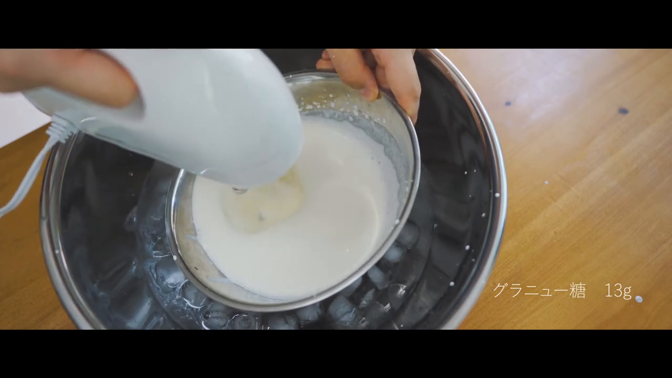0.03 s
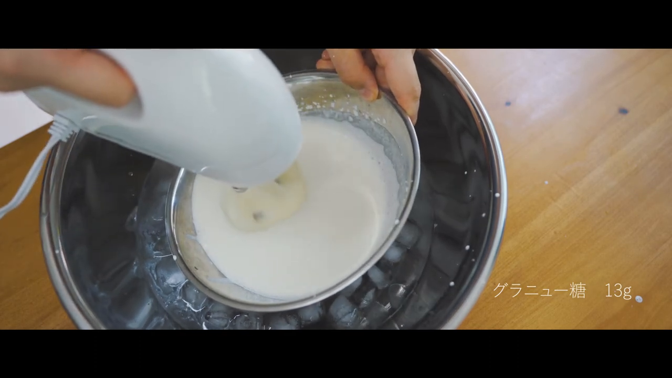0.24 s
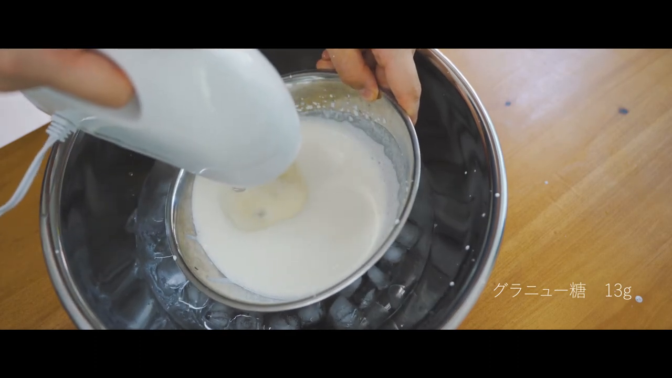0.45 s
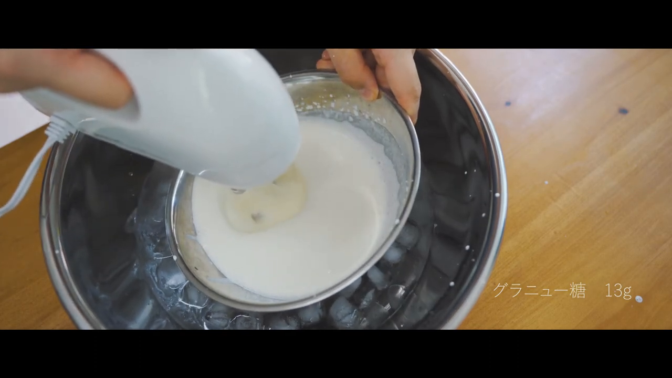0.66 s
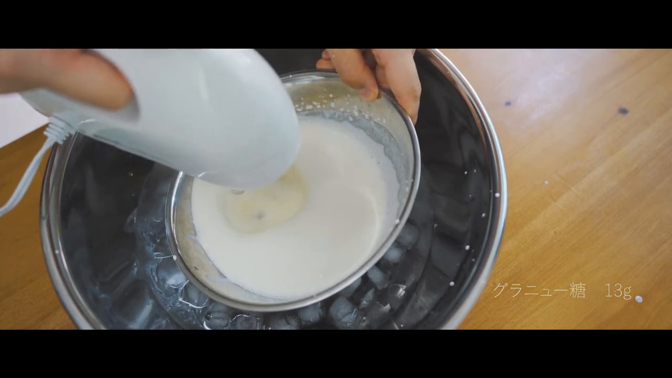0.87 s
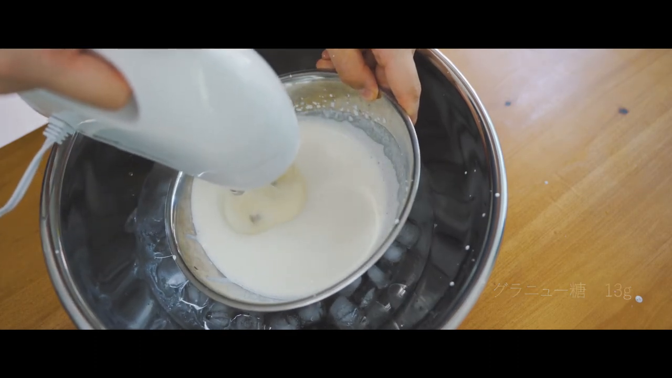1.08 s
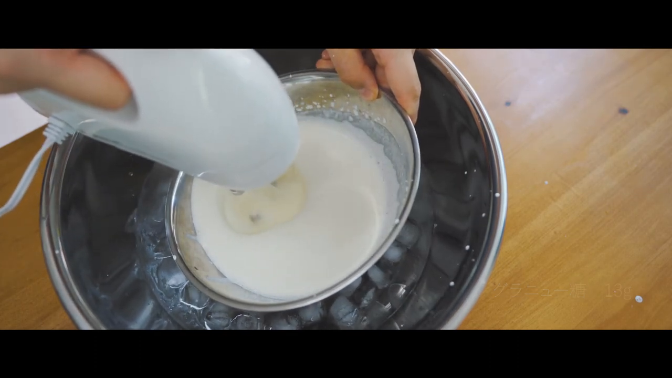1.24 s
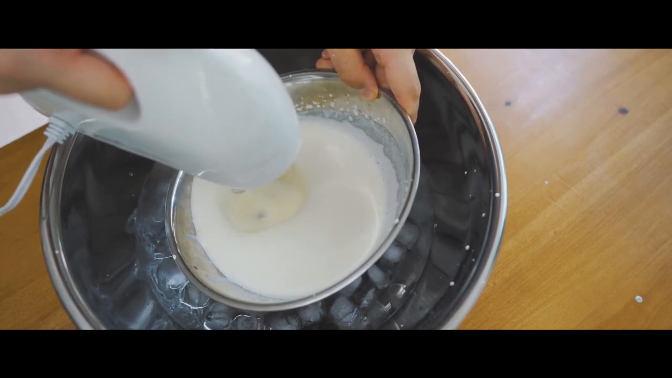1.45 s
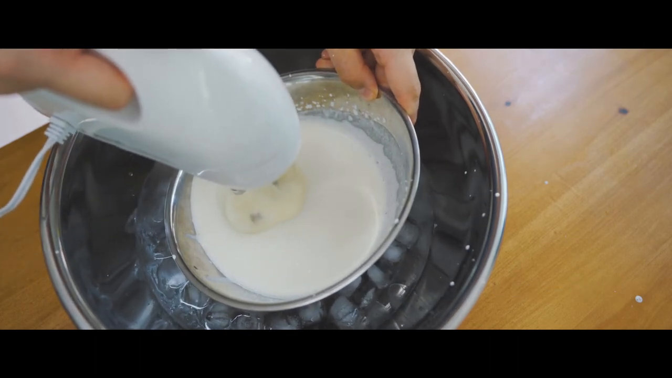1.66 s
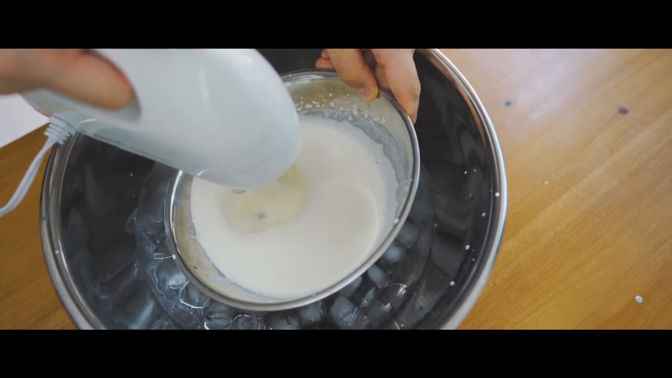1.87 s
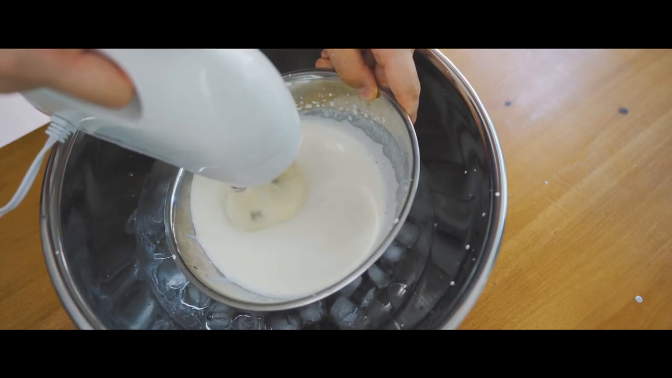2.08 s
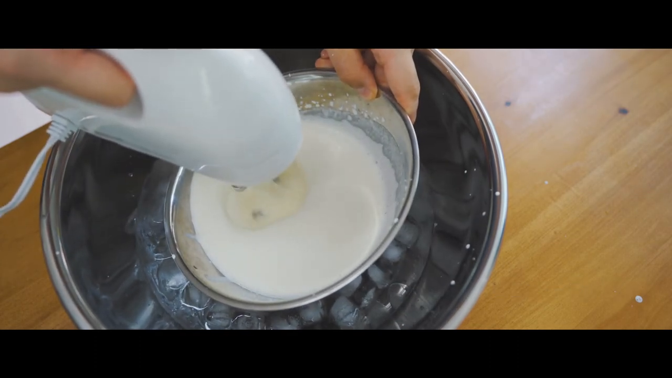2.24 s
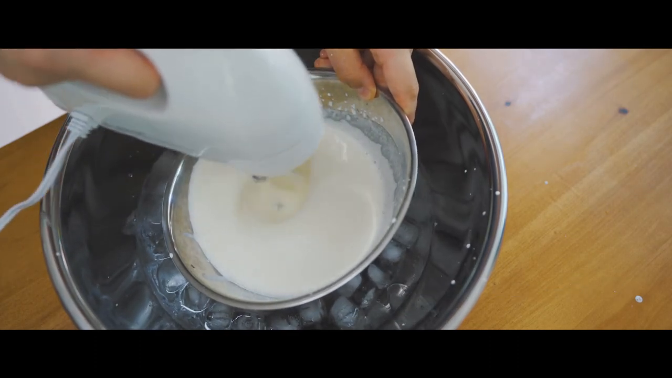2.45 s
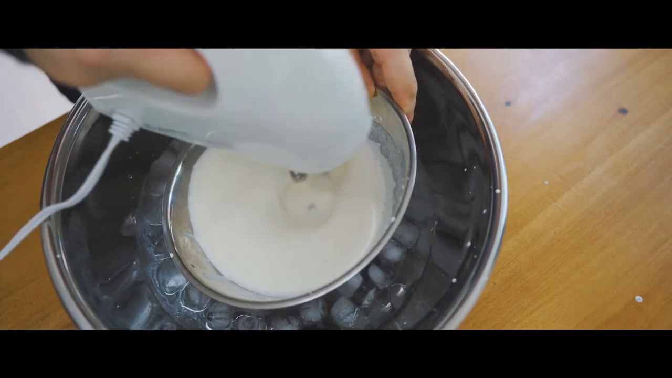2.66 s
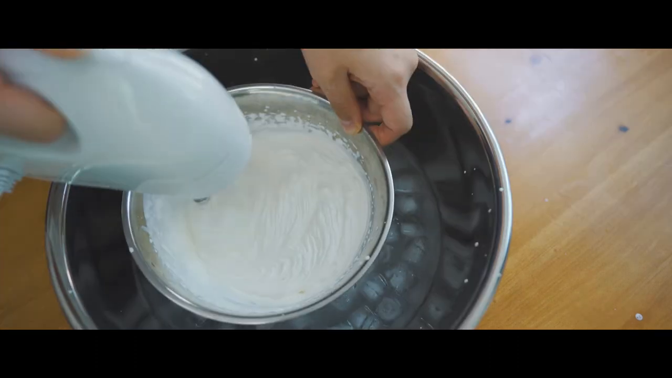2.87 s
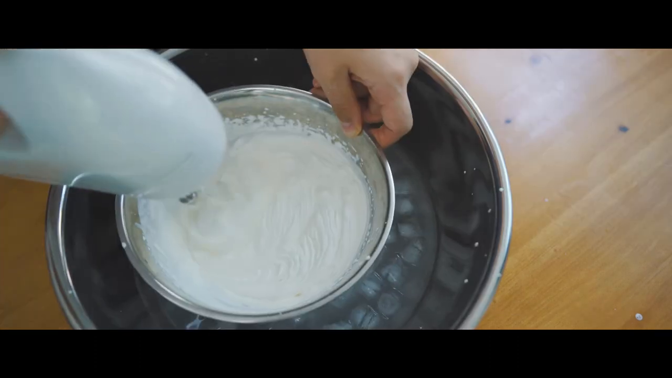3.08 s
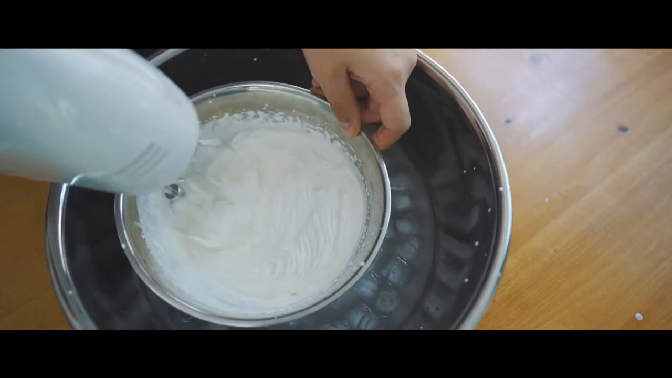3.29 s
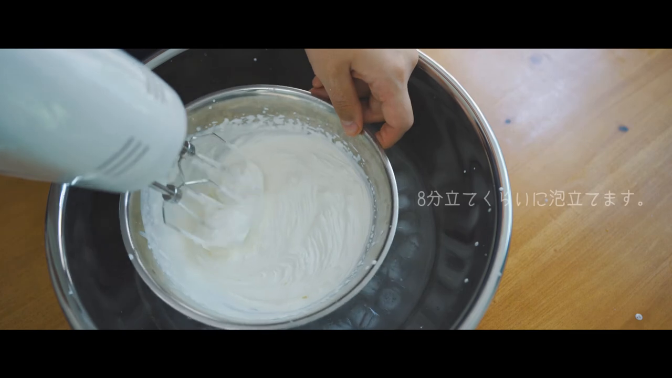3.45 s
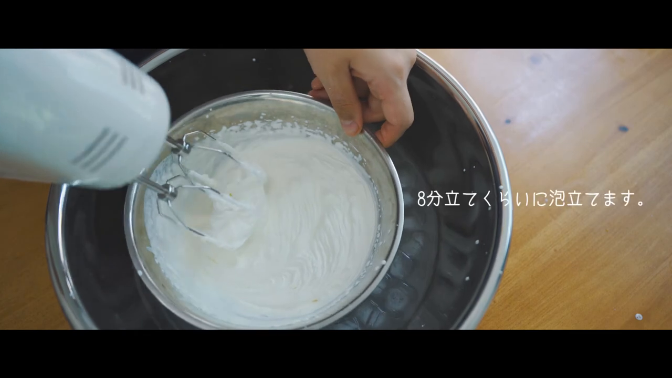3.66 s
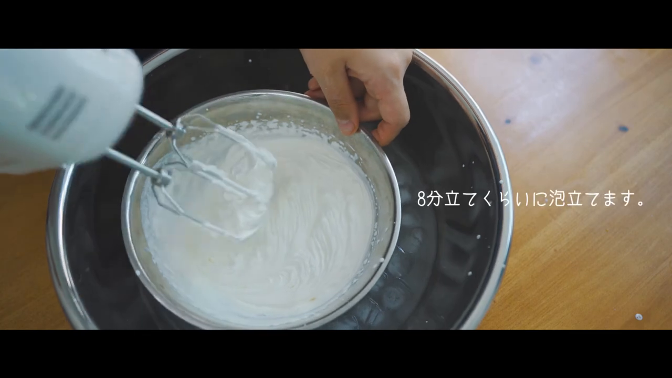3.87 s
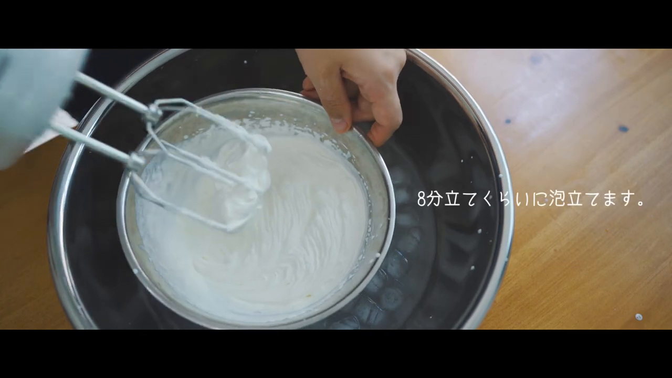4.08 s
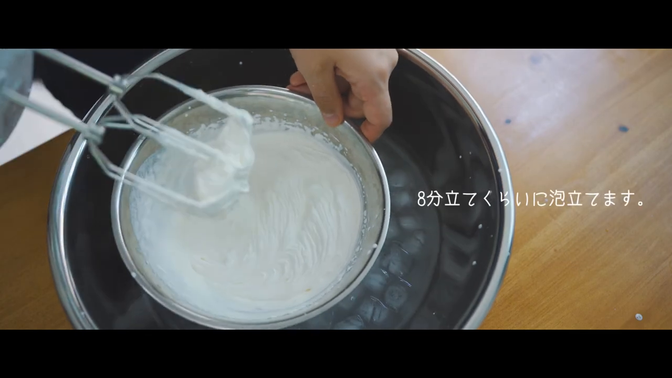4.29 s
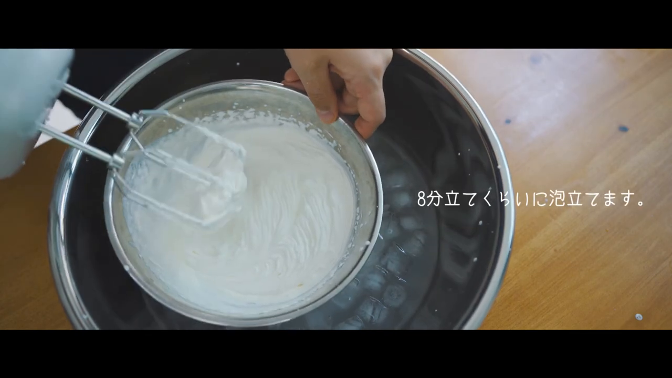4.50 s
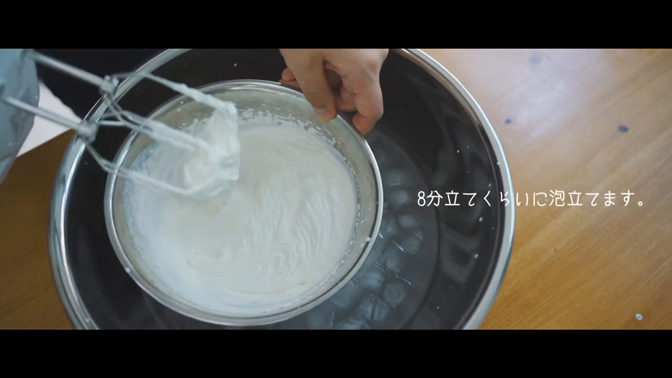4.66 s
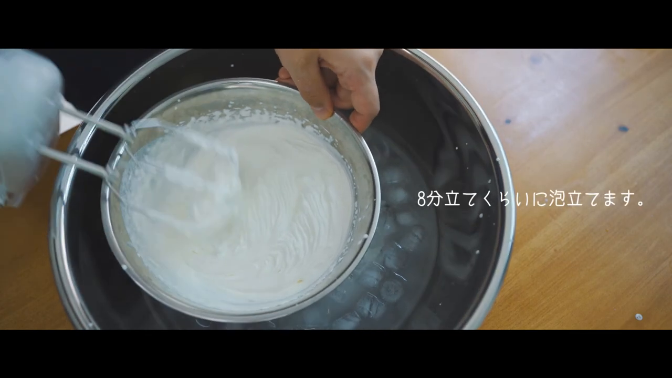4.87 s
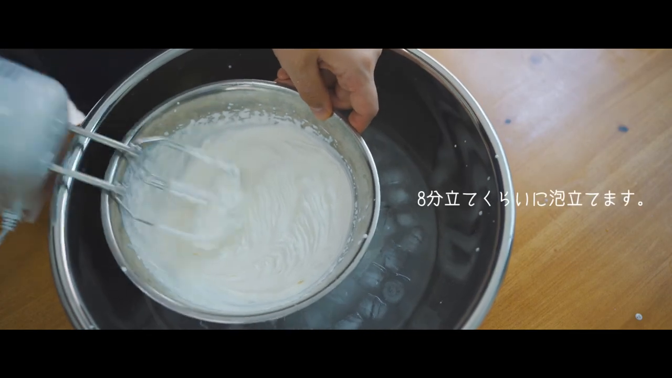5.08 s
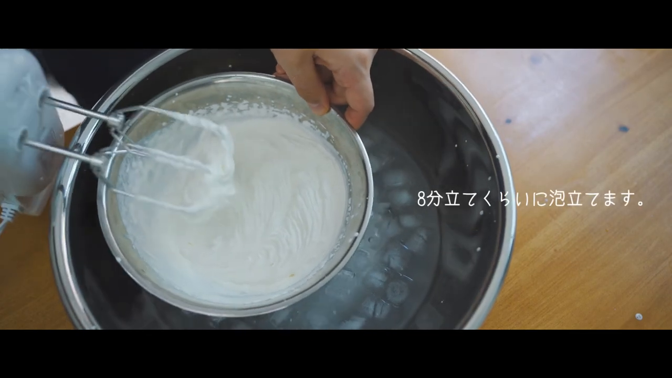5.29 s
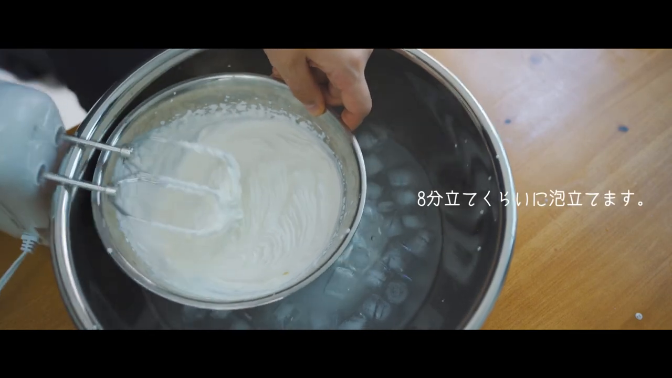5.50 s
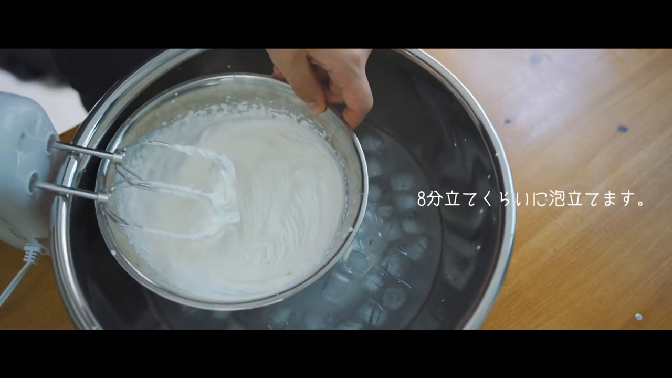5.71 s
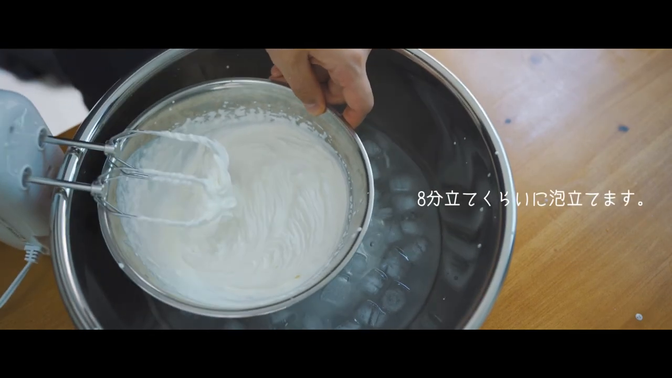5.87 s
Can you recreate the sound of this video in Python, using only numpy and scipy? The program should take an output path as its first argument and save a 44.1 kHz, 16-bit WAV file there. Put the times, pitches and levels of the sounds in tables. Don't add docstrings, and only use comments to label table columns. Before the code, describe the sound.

From the start an electric hand mixer runs close by, a piercing, slightly wavering whine near 2.9 kHz that rises a little in the first second, edged with mains buzz, over gear roar and airy fan hiss. Beaters make quick, soft flops in cream, growing fainter as it thickens. Low bumps around 2.7 seconds and a sharp knock near 2.9 mark the switch-off; the whine stops and a softer motor tone slides down, gone by 3.5. In the quiet kitchen, ice cubes tick brightly and briefly on steel from about 3.05, with small watery thuds, thickening into a stronger cluster around 4.4, then scattered clinks until 5. From 5.1 the steel bowls knock together in irregular clatter, strongest around 5.3 to 5.5, with noisy wet rattle and dull table bumps. A metallic ring lingers to the end near 6 seconds over faint refrigerator hum and room tone.

```python
import sys
import numpy as np
from scipy import signal
from scipy.fft import rfft, irfft
from scipy.io import wavfile
from scipy.ndimage import uniform_filter1d

SR = 44100
rng = np.random.default_rng(int(sys.argv[2]) if len(sys.argv) > 2 else 0)


def convert_level_to_amplitude(level_db):
    exponent = np.asarray(level_db, float) / 20
    return 10 ** exponent


def master_out(mix):
    frames = np.transpose(np.atleast_2d(mix))
    ceiling = np.clip(frames, -1, 1)
    pcm = np.round(ceiling * 32767).astype(np.int16)
    wavfile.write(sys.argv[1], SR, pcm)


N = 261954
TIME = np.arange(N) / SR
SIDES = np.array([[1], [-1]])

BARS, RIPPLE_HZ = 12, 100
GEARING = 20.2
OFF_S, STILL_S = 2.872, 3.6
# (time [s], bars passing per second [Hz])
SPEED = [(0.1, 2646), (0.16, 2690), (0.3, 2767), (0.46, 2824), (0.65, 2865), (0.87, 2887), (1.15, 2894),
         (1.45, 2894), (1.8, 2886), (2.4, 2879), (2.65, 2881), (2.83, 2889)]
# (time [s], level [dB])
WHINE = [(0.08, -30.5), (0.17, -33.5), (0.3, -32), (0.4, -29), (0.48, -29), (0.57, -32.5), (0.75, -27),
         (1.1, -29), (2.0, -27.5), (2.6, -27.5), (2.75, -36), (2.79, -29.5)]
# (bar multiple, ripple multiple, left over right [dB], left lead [rad])
MAIN_LINES = [
    (1, 0, -1, 0.085),
    (1, -1, 4.5, 0.29),
    (1, 1, 8.5, 1.22),
    (2, 0, -6.5, 0.61),
    (1, 2, 9, 0.5),
]
# (motor shaft multiple, ripple multiple, level [dB])
WEAK_LINES = [(3, 0, -58), (7, 0, -54), (8, 0, -55), (11, 0, -52), (24, -1, -55), (24, 1, -58),
              (34, 0, -69), (36, -1, -69), (37, 0, -71), (36, 0, -55), (36, 1, -69), (48, 0, -62),
              (60, 0, -57.5), (51, 0, -71), (53, 0, -70), (57, 0, -70), (61, 0, -72), (60, 1, -75),
              (0, 6, -47), (0, 12, -58), (0, 21, -55), (0, 25, -56), (0, 33, -64)]
# (frequency [Hz], level [dB])
RIPPLE_COLOUR = [(2545, -39), (2620, -39), (2700, -36), (2745, -40), (2780, -40), (2794, -33.5),
                 (2840, -37), (2885, -28), (2925, -37), (2950, -30), (2990, -37)]
# (frequency [Hz], level [dB])
SECOND_RIPPLE_COLOUR = [(2846, -40), (2880, -44), (2950, -41), (2980, -50), (3090, -55)]
# (frequency [Hz], level [dB])
OCTAVE_COLOUR = [(5290, -62), (5400, -50), (5700, -49), (5755, -53), (5788, -46)]
RIPPLE_DB, OCTAVE_DB, SPARK_DB = -0.57, -1.4, -78
TURN_S, TURN_HALF_S, TURN_DB = 2.585, 0.11, 10
RIPPLE_FADE_S, RIPPLE_FADE_DB = 2.7, -2

# (time [s], bars passing per second [Hz], level [dB])
RUNDOWN = [
    (2.88, 2230, -50),
    (2.98, 1875, -50),
    (3.09, 1500, -51),
    (3.18, 1250, -53),
    (3.265, 950, -53),
    (3.33, 765, -57),
    (3.42, 610, -62),
    (3.5, 480, -72),
]
# (frequency [Hz], level [dB])
RUNDOWN_COLOUR = [(600, -3), (800, -11), (950, -14), (1150, -7), (1400, -3), (1550, 3), (1750, 2),
                  (1950, 4), (2300, -10), (3000, -11), (4000, -8), (5500, -12), (8000, -11), (11000, -15),
                  (13500, -6), (16000, -9)]

# (time [s], level [dB])
LOAD = [(0, -30.5), (.2, -33), (.46, -34.5), (1, -35.5), (1.65, -35), (2.3, -37), (2.72, -33.5), (2.8, -34),
        (2.88, -33.5)]
# (frequency [Hz], level [dB per Hz])
BODY = [(190, -8.5), (330, 1), (536, -6), (598, 5.5), (781, -3), (1180, 0), (1370, -2.5), (1890, 6),
        (2330, 1), (2630, -8), (2900, -1), (3000, -4), (3230, -38), (5060, -56), (6000, -18), (7800, -58),
        (13200, -120)]
# (frequency [Hz], level [dB per Hz])
AIR = [(1940, 4), (3300, -2), (5050, -2.5), (5860, -2.5), (7280, -6.5), (8740, -4.5), (10500, -11),
       (12200, -30), (14800, -5)]
# (frequency [Hz], width [Hz], level [dB], extra once switched off [dB])
HOUSING = [(599.5, 25, -50.5, 3.5), (1176, 69, -54, 8), (1973, 200, -46.5, -7), (2550, 59, -47.5, -20),
           (4220, 260, -55.5, -0.5), (14300, 1000, -79, 19)]
COAST_DB, COAST_DB_PER_DECADE, COAST_SETTLE_S = -40.5, 28.5, 0.04
AIR_DB, AIR_FOLLOWS, AIR_COAST_DB = -45, 0.83, -7

# (time [s], level [dB])
SLOSH = [
    (0, -40.5),
    (.9, -45),
    (2.1, -47.5),
    (2.87, -61),
]

# (time [s], peak level [dB], pitch [Hz])
ICE_TICKS = [(3.394, -33.5, 2640), (3.484, -32.5, 2740), (3.529, -35.5, 2500), (3.639, -32, 2510),
             (3.752, -46, 3060), (3.922, -39.5, 2670), (4.035, -37, 2670), (3.932, -42, 2940),
             (4.086, -29, 2510), (4.112, -44, 2400), (4.125, -43, 2400), (4.137, -42, 2310),
             (4.184, -46, 3160), (4.208, -39.5, 2300), (4.284, -34.5, 2300), (4.308, -50, 2700),
             (4.345, -36, 2380), (4.427, -29, 2450), (4.44, -30, 2740), (4.506, -44, 2420),
             (4.555, -38.5, 2850), (4.636, -35.5, 2340), (4.657, -37.5, 2580), (4.686, -48, 2170),
             (3.055, -38, 2580), (3.075, -37, 2880), (3.143, -52, 2480), (3.175, -51, 2450),
             (3.23, -41, 2550), (3.27, -43, 2770), (3.328, -37, 2930), (4.332, -27, 2410),
             (4.364, -34, 2170), (4.383, -22, 2450), (4.391, -24, 2400), (4.396, -18, 2380),
             (4.41, -27, 2530), (4.417, -23.5, 2460), (4.48, -38, 2400), (4.436, -33, 2300),
             (4.49, -31.5, 2550), (4.523, -37, 2410), (4.644, -34, 2640), (4.77, -46, 2240),
             (4.803, -35, 2370), (4.832, -30, 2550), (4.953, -31.5, 2520), (4.965, -35, 2730),
             (3.43, -37, 1890), (3.445, -34, 1000), (3.797, -43, 1530), (3.858, -36, 970),
              (4.002, -39, 960), (4.236, -42, 1970), (4.259, -47, 980), (4.479, -30, 1095),
              (4.537, -35, 2060), (4.579, -35.5, 1470), (4.621, -36.5, 1420), (4.709, -39.5, 920),
              (4.859, -35.5, 810), (4.983, -38, 1440), (5.018, -34, 960)]
# (frequency [Hz], level [dB], time to fall 60 dB [s])
ICE_MODES = [(2393, -6, 0.033), (3170, -6, 0.018), (1470, -10, 0.03), (3990, -19.5, 0.047),
             (5220, -13.5, 0.022)]
TICK_THUD_DB = -56.5
# (time [s], peak level [dB], pitch [Hz])
THUDS = [(3.636, -49, 267), (3.919, -48, 280), (4.284, -43, 415), (4.331, -41, 370), (4.477, -47, 416),
         (4.522, -47, 373), (4.536, -51, 231), (4.622, -46, 595), (4.704, -45, 257), (4.831, -46.5, 694),
         (4.86, -36, 255)]
# (time [s], peak level [dB])
SNAPS = [(0.169, -37.5), (0.285, -44), (0.39, -54), (0.435, -43), (0.64, -41), (1.296, -37.5), (1.96, -43),
         (2.893, -49), (3.484, -51), (3.639, -56), (3.922, -61), (4.034, -48), (4.333, -51), (4.384, -35),
         (4.417, -61)]
# (time [s], peak level [dB])
PINGS = [
    (4.3852, -21),
    (4.393, -25),
    (4.3985, -23),
    (4.4178, -30),
]
PING_HZ, PING_HALF_S = 2420, 0.0018

# (time [s], peak level [dB], pitch [Hz], time to fall 60 dB [s], wash level [dB])
KNOCKS = [(2.82, -23.5, 2140, 0.092, -22), (2.895, -13, 2060, 0.023, -23.5), (5.115, -19, 3180, 0.021, -7),
          (5.117, -19, 617, 0.027, -30), (5.118, -23, 2200, 0.05, -33), (5.12, -28.5, 1272, 0.13, -30),
          (5.129, -19, 3390, 0.04, -18), (5.141, -25, 2470, 0.023, -15), (5.152, -20, 1276, 0.18, -9.5),
          (5.153, -27, 4660, 0.027, -12), (5.154, -25, 2050, 0.13, -30), (5.209, -27, 1346, 0.11, -14),
          (5.221, -24, 2450, 0.033, -18), (5.231, -26, 2600, 0.028, -20), (5.245, -27, 2600, 0.028, -24),
          (5.26, -26.5, 3760, 0.016, -14), (5.3, -26, 3100, 0.028, -5.5), (5.305, -28, 3000, 0.011, -23),
          (5.326, -21, 2760, 0.014, -12.5), (5.335, -24, 1540, 0.024, -30),
          (5.334, -19.5, 2450, 0.016, -26), (5.346, -29, 2770, 0.017, -27),
          (5.378, -22.5, 1530, 0.043, -33), (5.397, -23.5, 2410, 0.042, -20.5),
          (5.402, -24.5, 1500, 0.04, -27), (5.451, -33, 1380, 0.051, -7.5), (5.473, -28.5, 1660, 0.18, 5.5),
          (5.483, -27, 1530, 0.12, 2.5), (5.512, -25, 1740, 0.05, -30), (5.522, -33, 2550, 0.085, 7),
          (5.615, -26, 698, 0.085, 2), (5.618, -29, 1460, 0.05, -13), (5.63, -32, 4450, 0.03, -7),
          (5.643, -30.5, 1470, 0.072, -7), (5.772, -32, 2550, 0.019, -33), (5.804, -33.5, 1005, 0.043, -11),
          (5.83, -35, 1870, 0.023, -12.5), (5.896, -43, 2590, 0.023, -21), (5.909, -39, 2550, 0.061, -29)]
# (time [s], level [dB])
CLANGS = [
    (5.298, -50.5),
    (5.473, -34.5),
    (5.518, -35),
    (5.615, -41.5),
]
# (frequency [Hz], level [dB], time to fall 60 dB [s])
INNER = [(1237, -23, 0.22), (2060, -11, 0.059), (2450, -10, 0.063), (3440, -12.5, 0.022),
         (4400, -29, 0.027), (4970, -19, 0.027)]
# (frequency [Hz], level [dB], time to fall 60 dB [s])
OUTER = [(515, -5, 1.3), (876, -3, .9), (1483, -6, 2.5), (2240, -8, 2.), (2949, -2, 1.3), (3452, -17, 2.5),
         (3644, -11, 1.5), (3817, -11, 1.3), (3973, -12, 1.1), (4129, -8, 1.3), (4450, -13, 1.3),
         (4610, -13, 1.5), (4786, -15, 1.5), (4970, -14, 1.3)]
# (frequency [Hz], level [dB], time to fall 60 dB [s])
RIMS = [(3898, -11, .3), (1664, -3, .35), (1930, -10, .55), (1980, -11, .6), (2496, -4, .5), (2530, -7, .5),
        (2615, -8, .6), (3196, -5, .6), (4533, -3, .5), (5092, -2, .55), (5169, -7, .4), (5700, -9, .3),
        (6874, -14, .4), (6420, -10, .3)]
OUTER_DB = -3.5
# (time [s], peak level [dB], pitch [Hz])
BUMPS = [(0.625, -50, 111), (2.675, -31, 247), (2.7, -33, 190), (2.765, -41, 223), (2.875, -36, 242),
         (2.68, -32.5, 784), (2.86, -32.5, 171), (5.51, -40, 51.7), (5.66, -42, 45), (2.896, -45, 87.5),
         (4.386, -36.5, 368), (4.431, -38, 178), (4.854, -33, 250), (4.861, -45, 110), (5.121, -34.5, 257),
         (5.345, -38, 329), (5.38, -38, 430), (5.399, -40.5, 490), (5.494, -36, 226), (5.498, -35.5, 99),
         (5.628, -31, 112.5), (5.753, -41, 122.5), (5.82, -39.5, 243)]
BUMP_T60_S = 0.18
# (frequency [Hz], level [dB per Hz])
RATTLE = [(47, -48), (80, -8), (231, -5.5), (352, -9.5), (1090, -8), (1300, -13.5), (1760, -8),
          (2570, -5.5), (3660, -10), (5210, -4), (15700, -29)]
# (frequency [Hz], time to fall 60 dB [s])
RATTLE_T60 = [(100, 0.77), (1000, 0.97), (4000, 0.43), (12000, 0.2)]
# (frequency [Hz], width [Hz], level [dB])
HOLLOWS = [(1500, 400, -3), (1930, 260, -12), (2550, 200, -9), (3380, 250, -8), (4620, 230, -8.5),
           (5240, 260, -8), (7240, 2600, -9)]
BETWEEN_DB = -6

# (frequency [Hz], level [dB per Hz])
ROOM = [(12, -37), (20, -34), (181, -5.5), (268, 8.5), (326, -14), (538, -1), (773, -20), (864, -4.5),
        (1740, -13.5), (2430, -7.5), (4480, -17.5), (5300, -21.5), (15700, -27.5)]
ROOM_DB = -53.5
HUM_HZ, HUM_DB, OVERTONE_DB, HUM_AFTER_OFF_DB = 184, -54, -64.5, -8
# (time [s], half width [s], rise [dB])
SURGES = [
    (0.1, 0.91, 22.5),
    (3.25, 0.33, 12.5),
]
# (frequency [Hz], likeness [0 to 1])
LIKENESS = [(60, 0.97), (150, 0.99), (380, 0.81), (950, 0.83), (2380, 0.063), (5980, 0.012), (15000, 0.021)]


def whine():
    (bar_hz,), (whine_db,) = in_time(SPEED), in_time(WHINE)
    lean_db = RIPPLE_FADE_DB * np.clip((TIME - RIPPLE_FADE_S) * 20, 0, 1)
    turn_db = TURN_DB * np.exp(-((TIME - TURN_S) / TURN_HALF_S) ** 2)
    below_db = RIPPLE_DB + at_hz(RIPPLE_COLOUR, bar_hz - RIPPLE_HZ) + lean_db
    above_db = RIPPLE_DB + at_hz(RIPPLE_COLOUR, bar_hz + RIPPLE_HZ) + lean_db
    octave_db = OCTAVE_DB + at_hz(OCTAVE_COLOUR, 2 * bar_hz) + turn_db
    second_db = at_hz(SECOND_RIPPLE_COLOUR, bar_hz + 2 * RIPPLE_HZ)
    levels = [whine_db, below_db, above_db, octave_db, second_db]

    steady = 2 * np.pi * np.cumsum(bar_hz) / SR
    bar = steady + 0.07 * drift(54)
    ripple = 2 * np.pi * RIPPLE_HZ * TIME
    out = 0
    for (k, side, pan_db, lead), db in zip(MAIN_LINES, levels):
        wobbly_db = db + 1.2 * drift(25)
        out = out + tone(k * bar + side * ripple, wobbly_db, pan_db + 2.5 * drift(2), lead)

    sparks = [(order, 0, SPARK_DB) for order in range(41, 64)]
    for order, side, db in WEAK_LINES + sparks:
        phase = order / BARS * steady + side * ripple + 0.15 * drift(30)
        wobbly_db = db + 3 * drift(5)
        pan_db = 3 * drift(2)
        lead = rng.choice([-0.8, 0.8]) * (order > BARS)
        out = out + tone(phase, wobbly_db, pan_db, lead)
    return out * np.clip((OFF_S - TIME) / 0.0021, 0, 1), bar


def rundown():
    hz, db = in_time(RUNDOWN)
    span = slice(round(RUNDOWN[0][0] * SR), round(RUNDOWN[-1][0] * SR))
    hz, db, out = hz[span], db[span], np.zeros((2, N))
    phase = 2 * np.pi * np.cumsum(hz * (1 + 0.011 * drift(120)[span])) / SR
    late = np.clip((TIME[span] - 3.15) * 10, 0, 1)
    for k in range(1, 25):
        level_db = db + at_hz(RUNDOWN_COLOUR, k * hz) + 4 * drift(30)[span]
        level_db += 3 * (k == 1) - 1.1 * k
        level_db -= 7 * (k > 2) * late
        level_db -= 99 * (k * hz > 16000)
        out[:, span] += tone(k * phase, level_db, rng.normal(0, 1), rng.uniform(-0.7, 0.7))
    return out


def roar():
    size = round(STILL_S * SR)
    powered = TIME < OFF_S
    (load_db,) = in_time(LOAD)
    speed = in_time(RUNDOWN)[0] / RUNDOWN[0][1]
    coast_db = COAST_DB + COAST_DB_PER_DECADE * np.log10(speed) - 99 * (TIME > STILL_S)
    settle_db = 8.4 * np.exp(-np.abs(TIME - OFF_S) / COAST_SETTLE_S)
    body_db = np.where(powered, load_db, coast_db + settle_db)
    air_db = np.where(powered, AIR_DB + AIR_FOLLOWS * (load_db + 36), coast_db + AIR_COAST_DB)
    swell = 1 + 0.31 * powered * np.sin(2 * np.pi * RIPPLE_HZ * TIME + 1.0)
    gears = convert_level_to_amplitude(body_db - 2.0) * patchy(BODY, 0.41, size=size) * swell
    out = gears + convert_level_to_amplitude(air_db + 2.0) * patchy(AIR, 1.0, size=size)
    for hz, width_hz, db, idle_db in HOUSING:
        noise = rng.standard_normal(N) + 0.11 * rng.standard_normal((2, N))
        resonance = rms_one(ring(noise, hz, 2.33 / width_hz))
        out += convert_level_to_amplitude(db + idle_db * ~powered + body_db + 38) * resonance
    return out


def slosh(bar):
    turn = bar / BARS / GEARING
    flop = np.exp(4.5 * (np.cos(turn - 1.1) - 1)) * convert_level_to_amplitude(1.1 * drift(12.0))
    noise = rng.standard_normal(N) + 0.35 * rng.standard_normal((2, N))
    flops = band_pass(noise, 170, 340) * flop
    return convert_level_to_amplitude(in_time(SLOSH, -120)[0] - 7.0) * flops / np.sqrt(np.mean(flops ** 2))


def bowls():
    s, db, hz, t60, wash_db = np.array(KNOCKS).T
    hardest = max(CLANGS, key=lambda row: row[1])
    out = struck(RIMS, CLANGS, np.array(CLANGS)[:, 1], spread_db=1.5)
    out = out + struck(OUTER, [hardest], hardest[1] + OUTER_DB, spread_db=0.5)
    out += struck(INNER, KNOCKS, db + 0.4 * wash_db - 7, spread_db=4)
    out += hollow(wash(KNOCKS, db + wash_db + 5.5, stretch=0.92))
    knock = contacts(db - 5, hz, t60, rough=np.clip(0.025 / t60, 0.1, 0.4)[:, None])
    knock = knock + cracks(db + wash_db - 14, 0.015, 3500, 11000) + cracks(db - 16, 0.012, 800, 5000)
    add(out, knock, s, pan_db=1.5)
    s, db, hz = np.array(BUMPS).T
    add(out, contacts(db, hz, BUMP_T60_S * np.sqrt(150 / hz), rough=0.3), s, pan_db=0.5)
    return out


def ice():
    ticks = sorted(ICE_TICKS)
    s, db, hz = np.array(ticks).T
    out = struck(ICE_MODES, ticks, db - 8.5, spread_db=3.5)
    out += hollow(wash(ticks, db - 12, stretch=0.79))
    thud = contacts(TICK_THUD_DB + 0 * s, rng.uniform(297, 568, len(s)), 0.045 + 0 * s, rough=1.0)
    tick = contacts(db - 4.5, hz, 0.026 + 0 * s, rough=0.51)
    add(out, tick + thud + cracks(db - 17.0, 0.012, 870, 2300), s, pan_db=8.0)
    s, db, hz = np.array(THUDS).T
    add(out, contacts(db + 0.5, hz, 0.11 + 0 * s, rough=0.82), s, pan_db=3.5)
    s, db = np.array(SNAPS).T
    add(out, cracks(db, 0.065, 2400, 6400), s, pan_db=13.0)
    return out


def pings():
    out = 0
    for s, db in PINGS:
        age = TIME - s
        out = out + convert_level_to_amplitude(db) * np.exp(-(age / PING_HALF_S) ** 2) * np.sin(2 * np.pi * PING_HZ * age)
    return out


def kitchen():
    after = TIME > OFF_S
    surge_db = sum(db * np.exp(-((TIME - s) / half_s) ** 2) for s, half_s, db in SURGES)
    levels = [HUM_DB + HUM_AFTER_OFF_DB * after + 0.87 * drift(3.8), OVERTONE_DB + surge_db]
    hum = sum(tone(2 * np.pi * k * HUM_HZ * TIME, db - 5.5, 0, 0.92) for k, db in enumerate(levels, 1))
    low_rumble = band_pass(rng.standard_normal(N) + 0.3 * rng.standard_normal((2, N)), 25, 140)
    return convert_level_to_amplitude(ROOM_DB - 4.5) * patchy(ROOM, 1.0) + hum + convert_level_to_amplitude(-66) * rms_one(low_rumble) * after


def struck(modes, rows, db, spread_db):
    at, out = [round(row[0] * SR) for row in rows], 0
    luck = rng.normal(0, 1, (len(rows), len(modes), 3))
    for k, (hz, mode_db, t60) in enumerate(modes):
        clicks = np.zeros((2, N))
        strength = convert_level_to_amplitude(db + mode_db + spread_db * luck[:, k, 0]) * np.sign(luck[:, k, 2])
        clicks[:, at] = strength * (1 + 0.45 * luck[:, k, 1] * SIDES)
        out = out + ring(clicks, hz, t60) * convert_level_to_amplitude(2 * drift(25))
    return out


def wash(rows, db, stretch):
    blows, out = np.zeros(N), 0
    grain_db = drift(90)
    np.add.at(blows, [round(row[0] * SR) for row in rows], convert_level_to_amplitude(db) ** 2)
    for hz, band in bands(RATTLE):
        keep = convert_level_to_amplitude(-120 / (stretch * at_hz(RATTLE_T60, hz) * SR))
        power = signal.lfilter([1], [1, -keep], blows + 1e-18)
        out = out + band * np.sqrt(power) * convert_level_to_amplitude(2 * drift(60) + grain_db)
    return out


def hollow(x):
    out = convert_level_to_amplitude(BETWEEN_DB) * x
    for hz, width_hz, db in HOLLOWS:
        out = out + convert_level_to_amplitude(db) * signal.lfilter(*signal.iirpeak(hz, hz / width_hz, fs=SR), x)
    return out


def contacts(db, hz, t60, rough):
    age = np.arange(round(0.3 * SR)) / SR
    wobble = uniform_filter1d(rng.standard_normal((len(db), 2, len(age))), size=90, axis=2) * 9.5
    note = np.sin(2 * np.pi * hz[:, None] * age + rough * wobble[:, 0]) * (1 + rough * wobble[:, 1])
    fade = convert_level_to_amplitude(db[:, None] - 60 * age / np.clip(t60, 0.005, 0.5)[:, None])
    onset = np.minimum(age * hz[:, None] / 2.5, 1)
    return note * fade * onset


def cracks(db, t60, low_hz, high_hz):
    age = np.arange(round(0.3 * SR)) / SR
    noise = band_pass(rng.standard_normal((len(db), len(age))), low_hz, high_hz)
    return rms_one(noise) * convert_level_to_amplitude(db[:, None] - 60 * age / t60)


def add(out, sounds, times, pan_db):
    for sound, s, side in zip(sounds, times, rng.normal(0, 1, len(times))):
        i = round(s * SR)
        out[:, i:i + len(sound)] += convert_level_to_amplitude(pan_db * side / 2 * SIDES) * sound[:N - i]


def ring(clicks, hz, t60):
    r, w = convert_level_to_amplitude(-60 / (t60 * SR)), 2 * np.pi * hz / SR
    return signal.lfilter([0, np.sin(w)], [1, -2 * r * np.cos(w), r * r], clicks + 1e-18)


def tone(phase, db, pan_db, lead):
    return np.sqrt(2) * convert_level_to_amplitude(db + pan_db / 2 * SIDES) * np.sin(phase + lead / 2 * SIDES)


def patchy(spectrum, patchy_db, size=N):
    sound = sum(band * convert_level_to_amplitude(patchy_db * drift(11.0)[:size]) for hz, band in bands(spectrum, size=size))
    return np.pad(rms_one(sound), [(0, 0), (0, N - size)])


def bands(spectrum, size=N):
    edges = 20 * 2 ** np.arange(0, 9.7, 1 / 3)
    white = rng.standard_normal((2, 2, size))
    for k, (low, high) in enumerate(zip(edges, edges[1:])):
        hz = np.sqrt(low * high)
        if spectrum[0][0] * 0.8 < hz < spectrum[-1][0] * 1.2:
            mid, side = band_pass(white[k % 2], low, high)
            alike = np.clip(at_hz(LIKENESS, hz), 0, 1)
            stereo = np.sqrt(1 + alike) * mid + np.sqrt(1 - alike) * side * SIDES
            yield hz, convert_level_to_amplitude(at_hz(spectrum, hz)) * stereo


def band_pass(x, low_hz, high_hz):
    return signal.sosfilt(signal.butter(2, [low_hz, high_hz], "band", fs=SR, output="sos"), x)


def drift(rate):
    r = np.exp(-80 * np.pi * rate / SR)
    slow = signal.lfilter([1], [1, -2 * r, r * r], rng.standard_normal(N // 40 + 2002))[2000:]
    return np.interp(np.arange(N) / 40, np.arange(len(slow)), rms_one(slow))


def in_time(rows, silent_db=None):
    s, *columns = np.transpose(rows)
    return [np.interp(TIME, s, c, right=silent_db) for c in columns]


def at_hz(points, hz):
    known_hz, value = np.array(points)[:, 0], np.array(points)[:, 1]
    return np.interp(np.log(hz), np.log(known_hz), value)


def rms_one(x):
    return x / np.sqrt(np.mean(x ** 2) + 1e-20)


def scene():
    lines, bar = whine()
    return lines + rundown() + roar() + slosh(bar) + ice() + pings() + bowls() + kitchen()


def band_limit(x):
    return signal.sosfilt(signal.butter(12, 15880, fs=SR, output="sos"), x)


def record(dry):
    hz = np.arange(N // 2 + 1) * SR / N
    lag = np.exp(-2j * np.pi * hz * 52e-6 * np.exp(-(hz / 7500) ** 2))
    late = np.array([dry[0], irfft(rfft(dry[1]) * lag, N)])
    mix = signal.sosfilt(signal.cheby2(12, 60, 16200, fs=SR, output="sos"), late)
    return band_limit(mix)


dry = scene()
out = record(dry)
master_out(out)
```